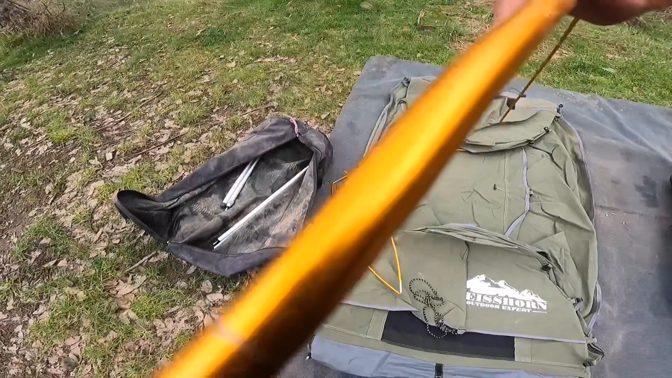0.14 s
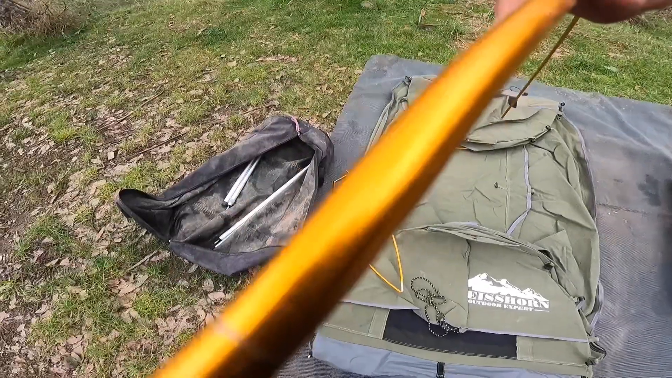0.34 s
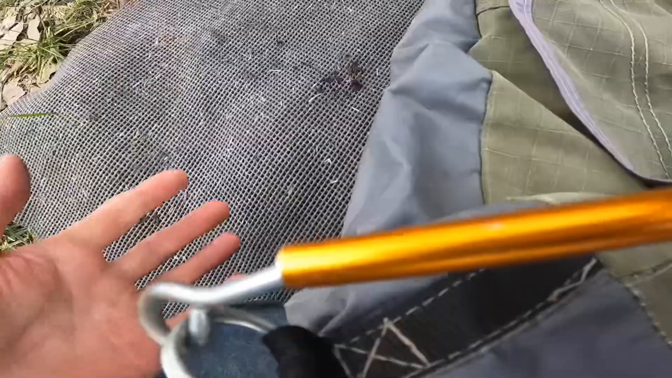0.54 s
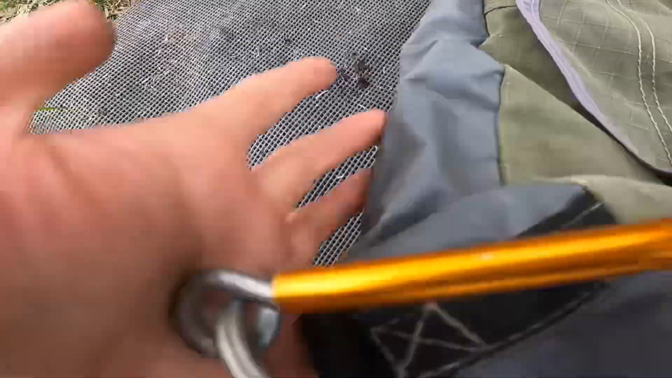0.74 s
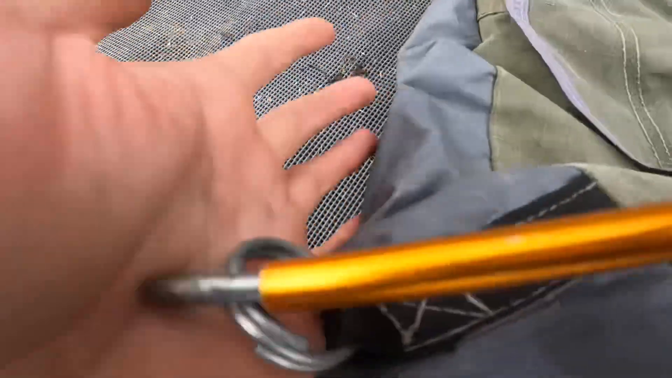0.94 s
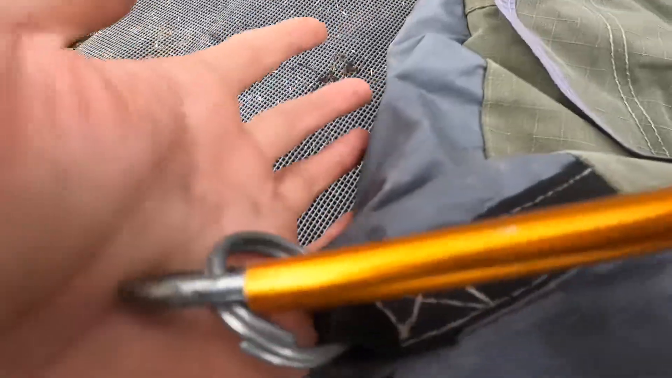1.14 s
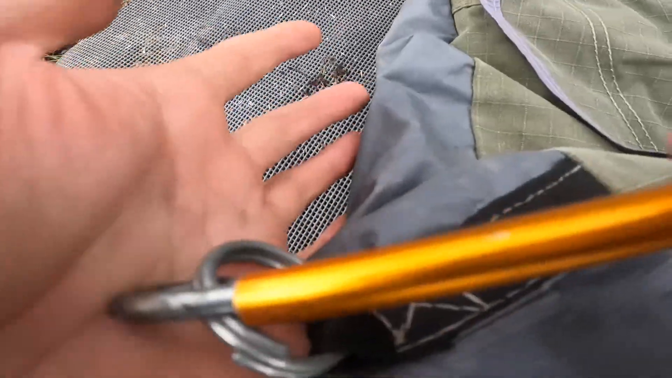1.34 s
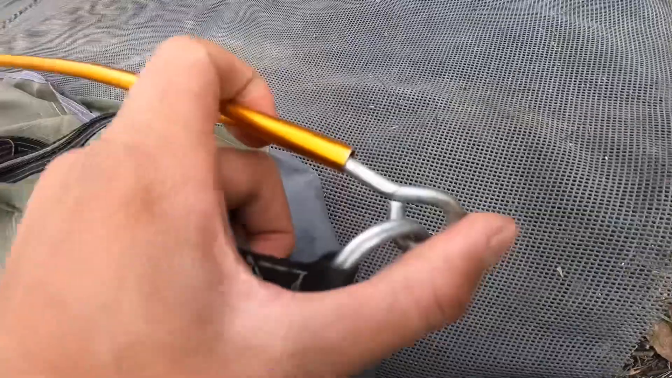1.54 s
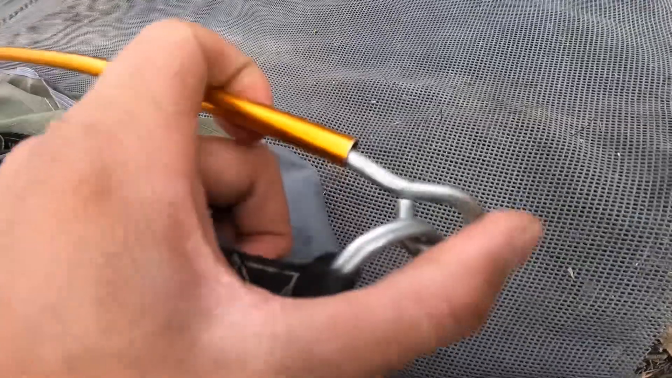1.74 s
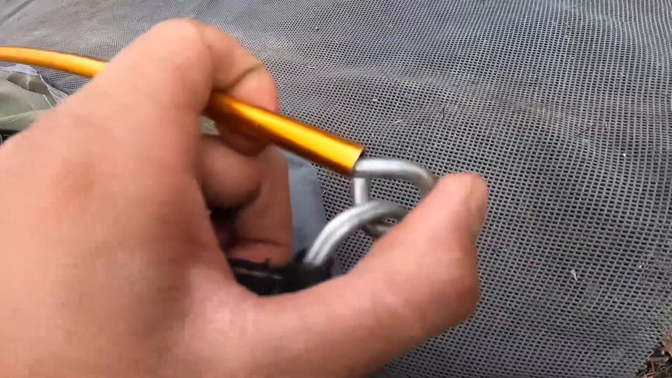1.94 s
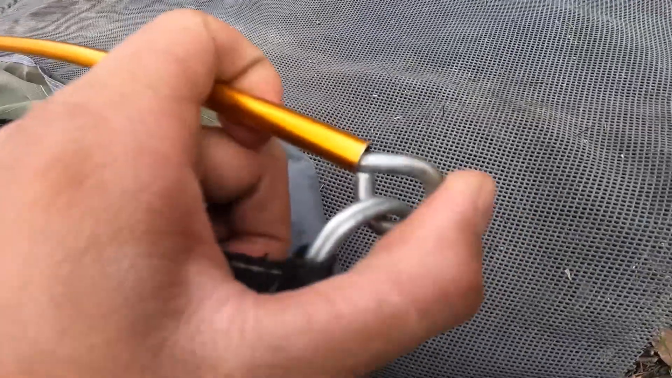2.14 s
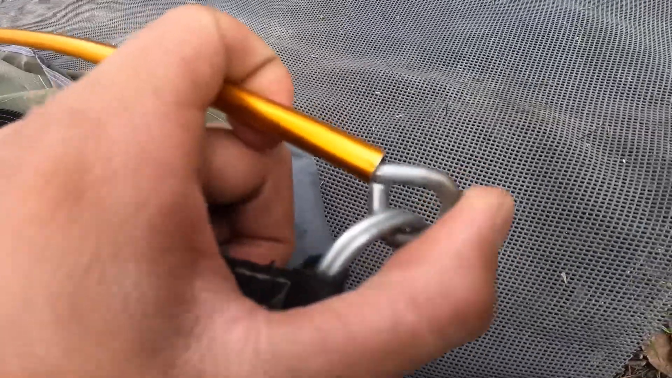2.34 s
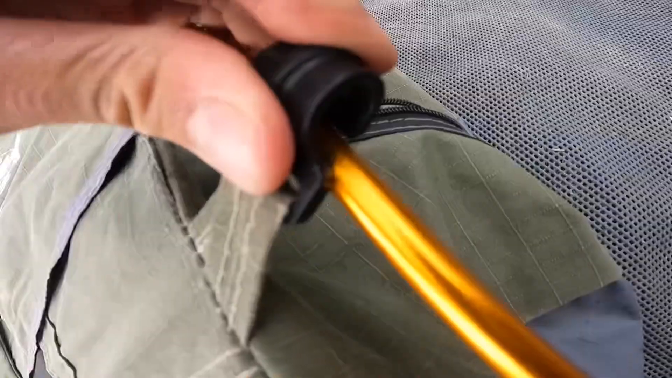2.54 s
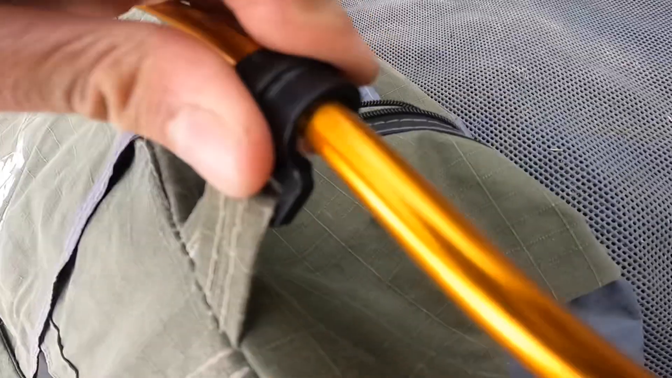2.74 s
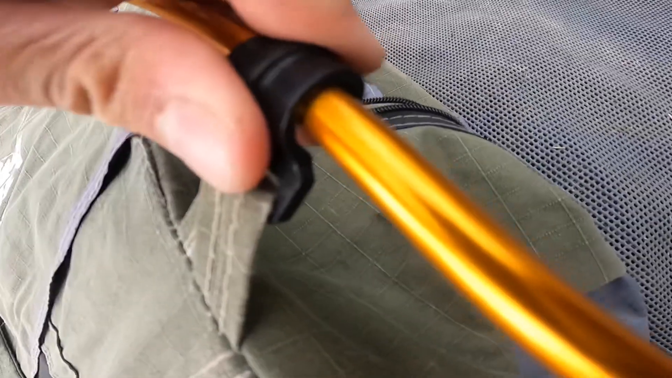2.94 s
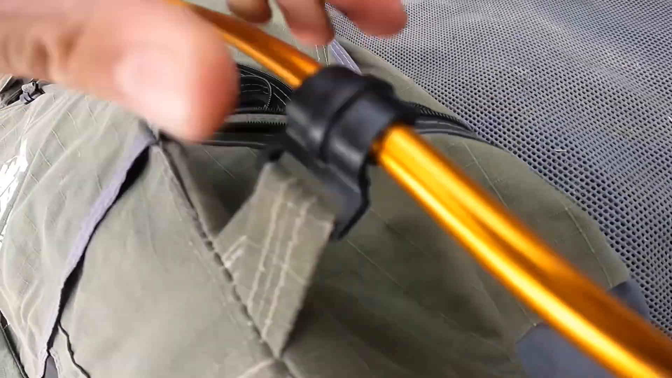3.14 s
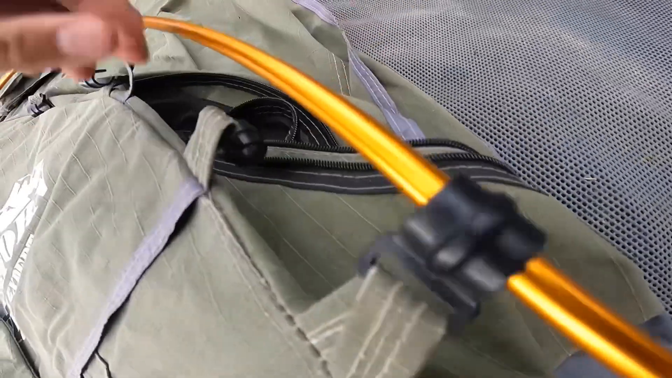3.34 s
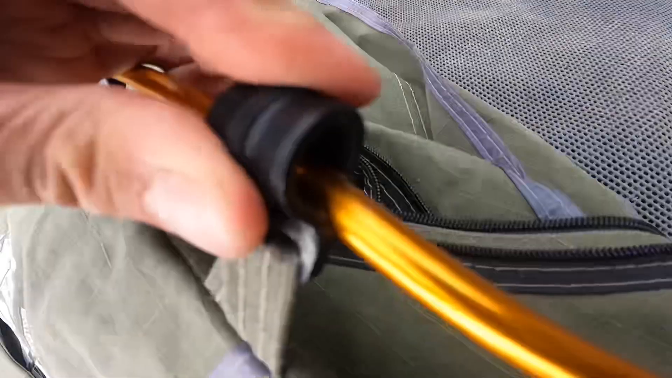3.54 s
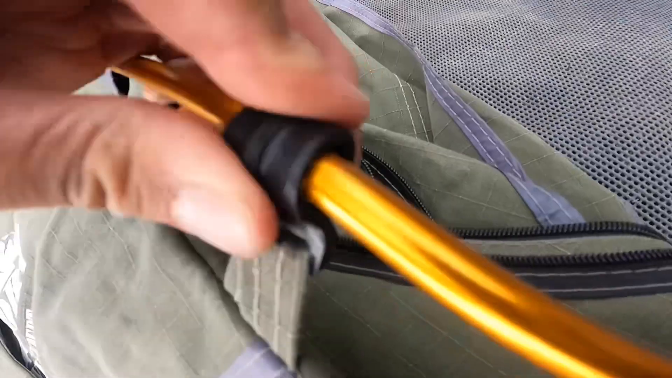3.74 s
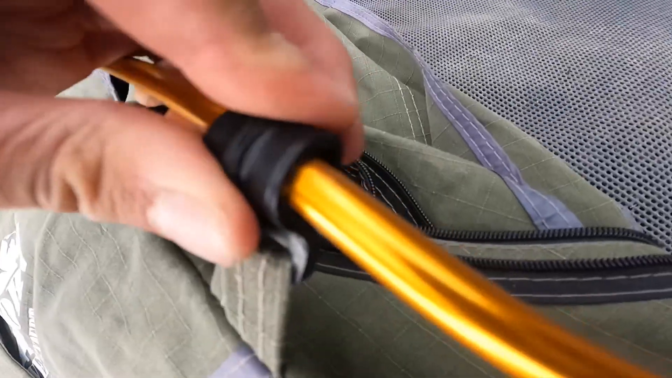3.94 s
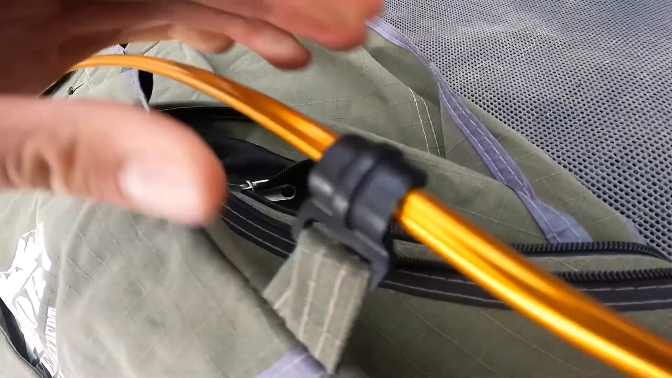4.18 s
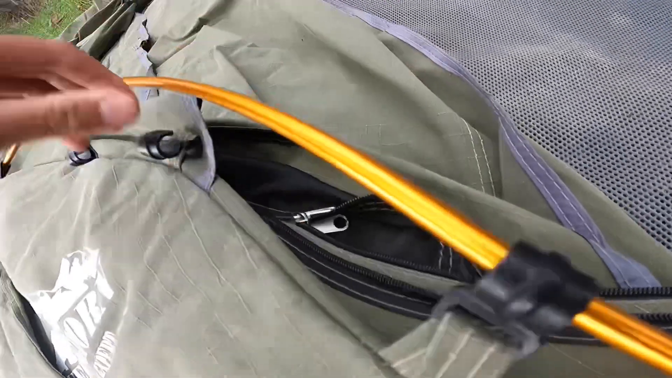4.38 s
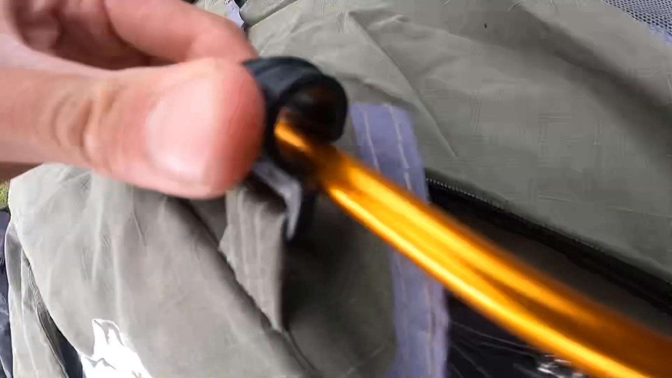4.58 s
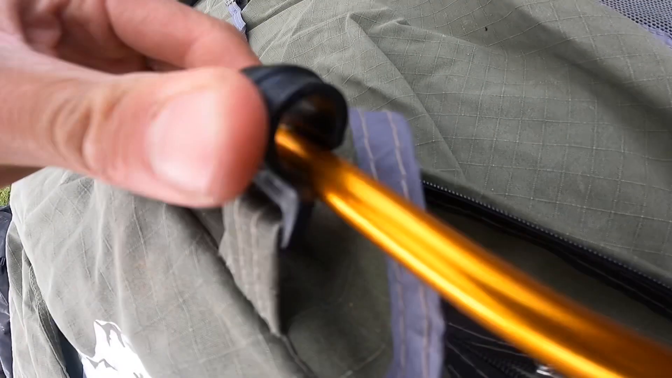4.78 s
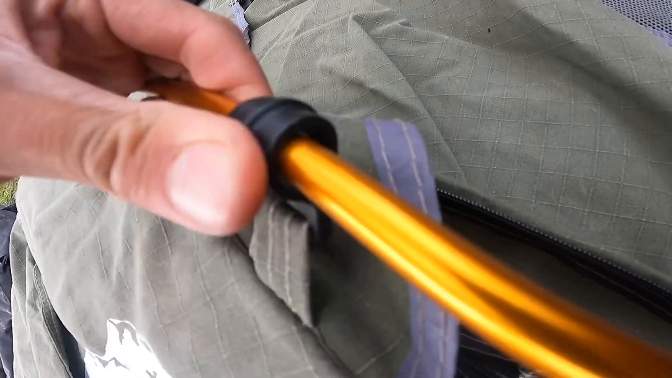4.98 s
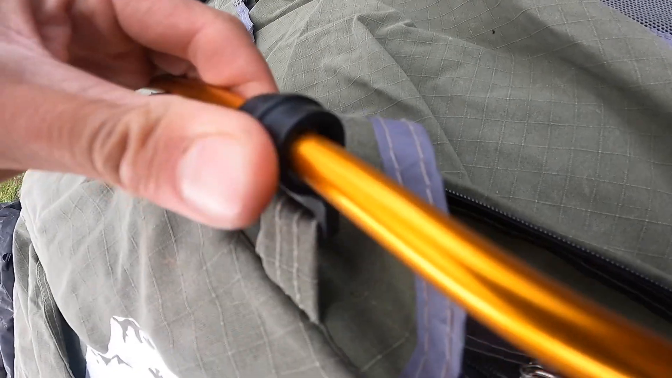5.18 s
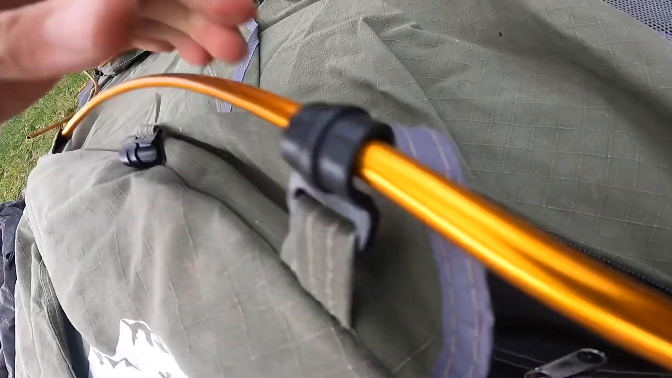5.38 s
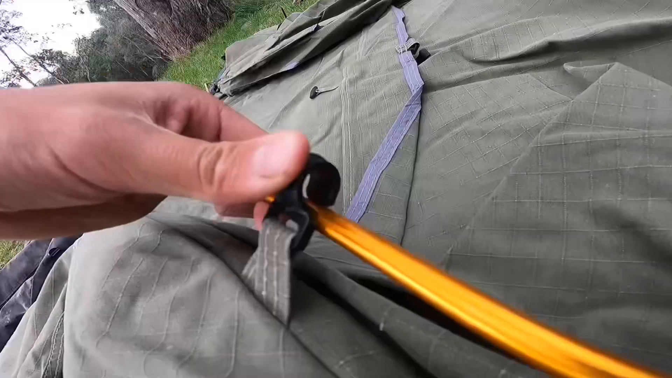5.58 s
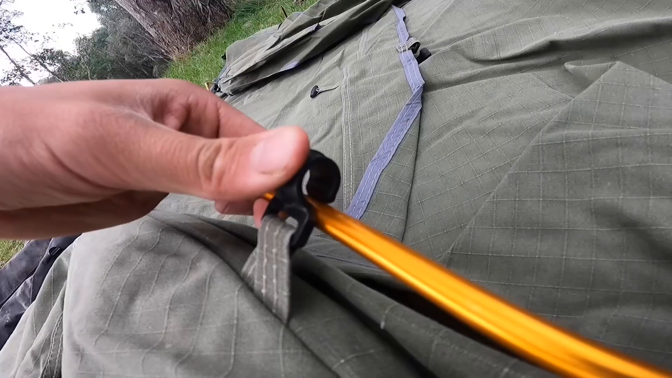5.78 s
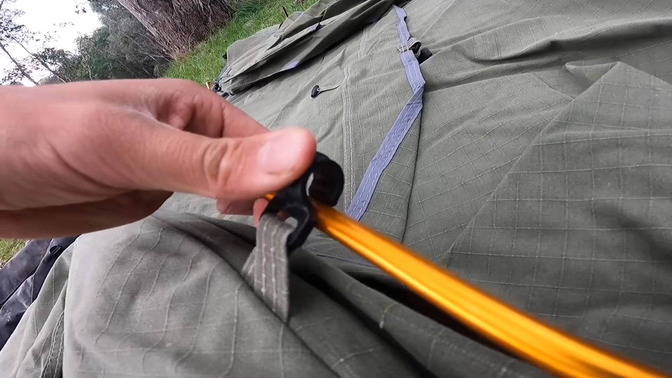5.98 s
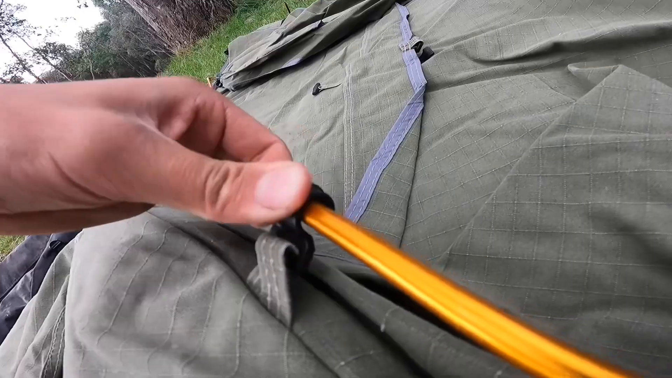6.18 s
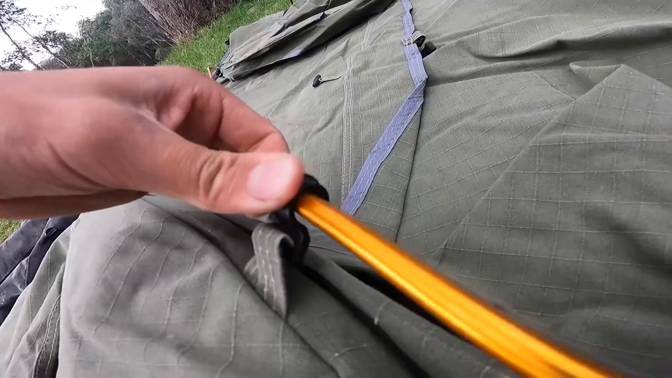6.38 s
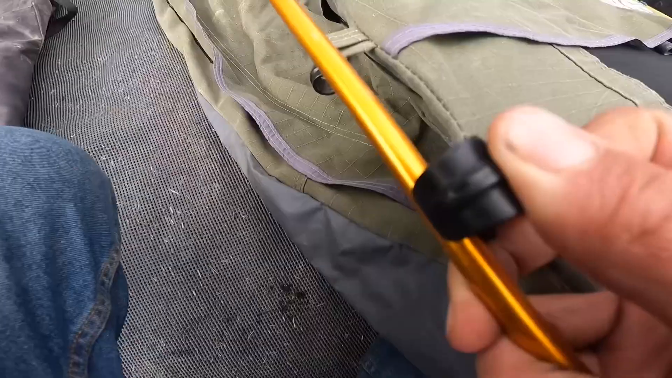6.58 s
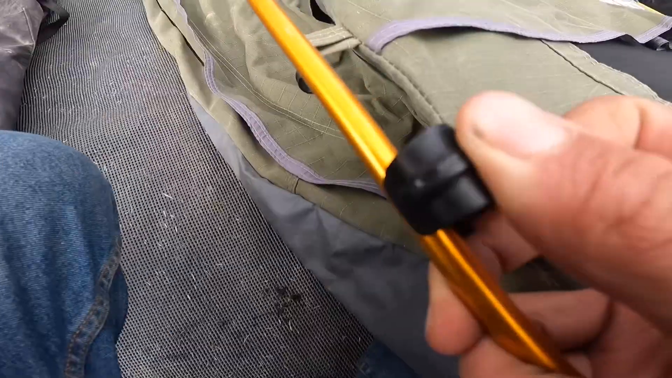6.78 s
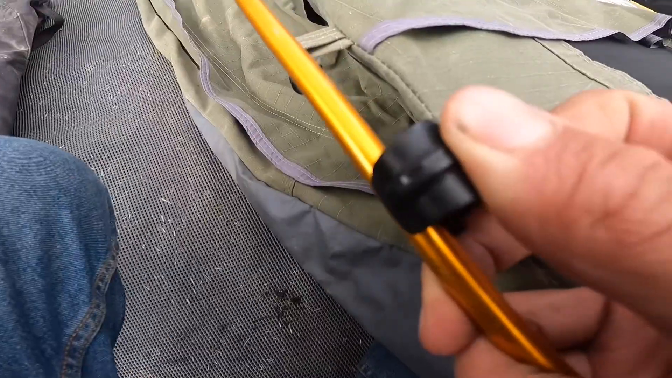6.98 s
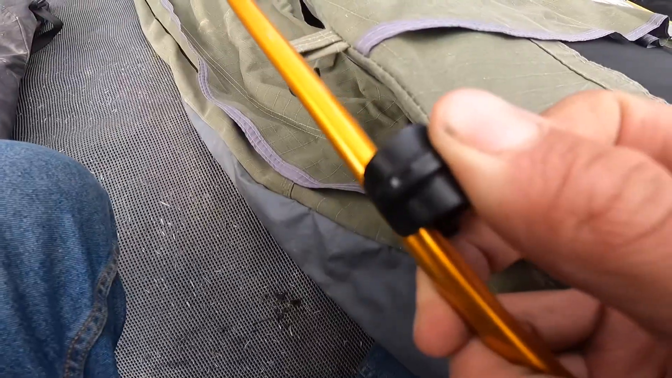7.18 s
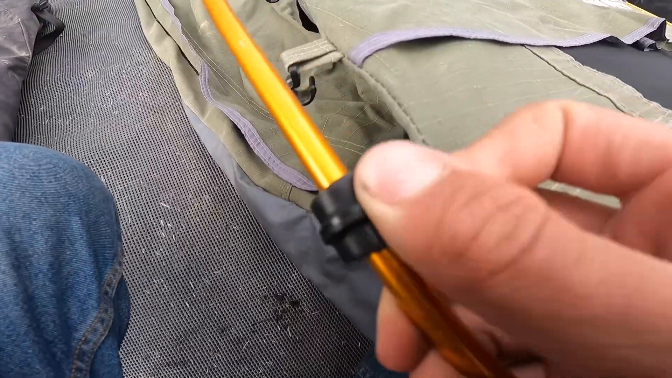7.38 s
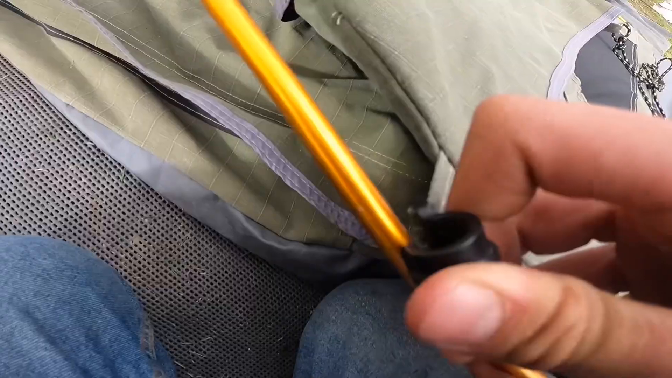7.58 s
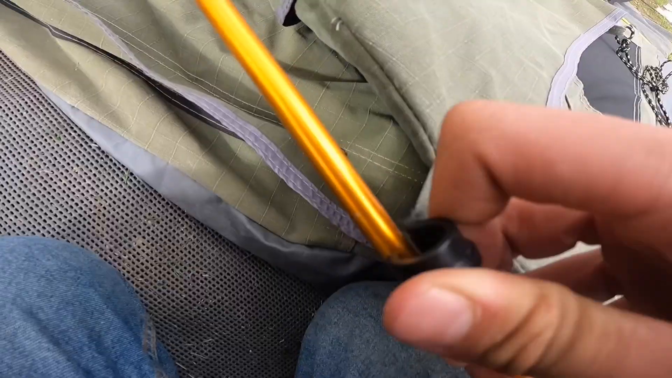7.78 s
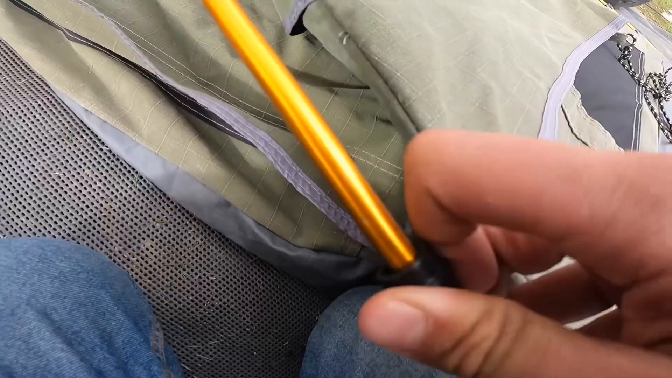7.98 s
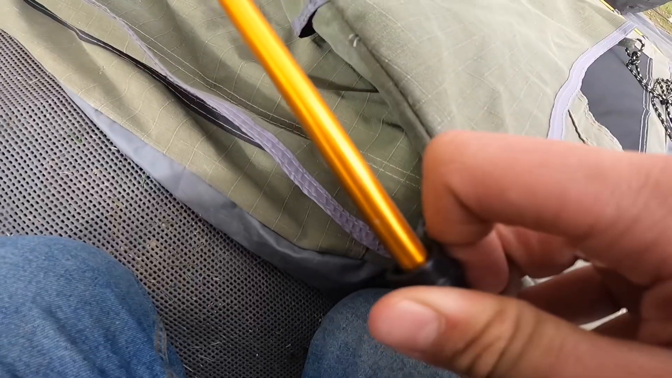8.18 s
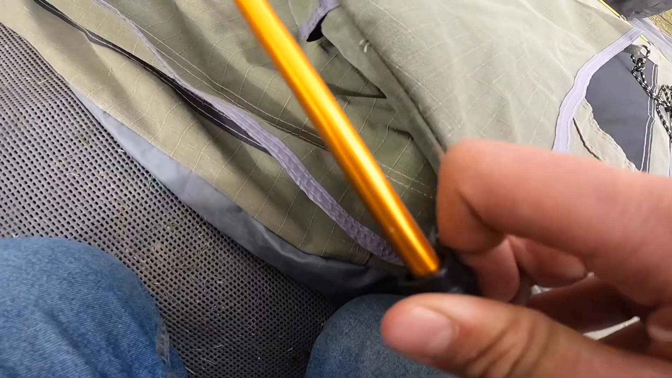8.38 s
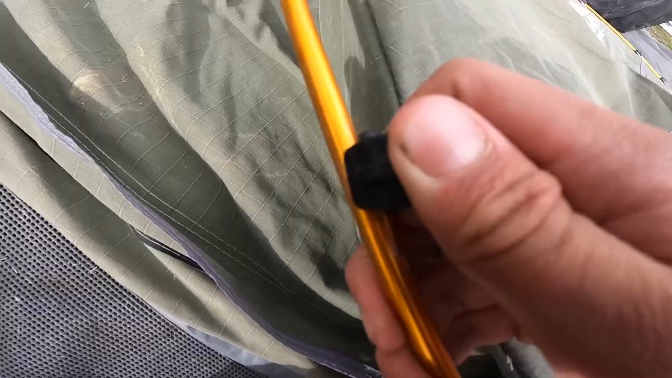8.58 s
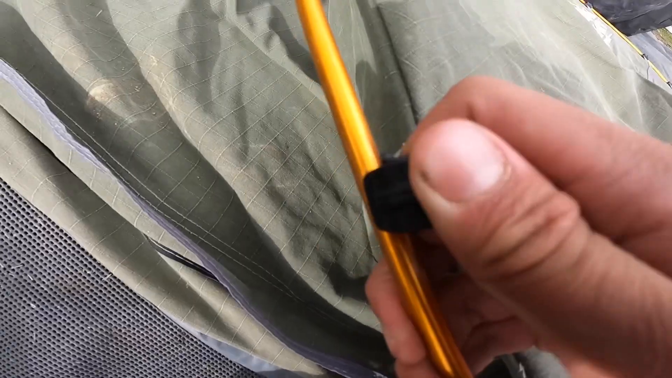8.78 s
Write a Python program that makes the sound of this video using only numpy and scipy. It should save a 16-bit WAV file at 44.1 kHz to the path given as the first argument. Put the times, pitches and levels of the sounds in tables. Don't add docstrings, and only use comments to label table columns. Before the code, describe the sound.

Outdoors, soft leaf hiss and a low distant traffic drone lie under close handling sounds. The first half second is muffled, with a small low bump at the start. At about 0.87 s a hard clack and deep thump begin a flurry of bright steel jingles, ending with another clink near 1.06 s; faint ticks follow around 1.7. A small metallic click lands at 1.98. Plastic clips then creak briefly and snap: a duller one at 2.83, a strong one at 3.86, crisp ones at 4.99, 6.3, 7.48 and 8.01, plus a lighter click at 5.46. Snaps are dry and very short, with pole ring and canvas thump. The background dips after the louder ones. Around every second it drops out for a few hundredths of a second, returning brighter or duller. After 8.1 s only quiet hiss remains.

```python
import sys
import numpy as np
from scipy import signal
from scipy.fft import rfft, irfft
from scipy.io import wavfile
from scipy.ndimage import uniform_filter1d

SR = 44100
rng = np.random.default_rng(int(sys.argv[2]) if len(sys.argv) > 2 else 0)


def ratio_of_db(decibels):
    return 10 ** (np.asarray(decibels, float) / 20)


def wav_out(sig):
    wavfile.write(sys.argv[1], SR, np.round(np.clip(np.atleast_2d(sig).T, -1, 1) * 32767).astype(np.int16))


N = 388962


def gains(table, size):
    hz, db = np.transpose(table)
    return ratio_of_db(np.interp(np.log(np.fft.rfftfreq(size, 1 / SR) + 1), np.log(hz), db))


def colour(x, table):
    return irfft(rfft(x) * gains(table, size=x.shape[-1]), x.shape[-1])


def unit(x, lo_hz, hi_hz):
    band = signal.sosfilt(signal.butter(4, [lo_hz, hi_hz], "band", fs=SR, output="sos"), x)
    return x / np.sqrt(np.mean(band ** 2))


def walk(rate_hz):
    hold = int(SR / rate_hz)
    steps = np.repeat(rng.standard_normal(N // hold + 1), hold)
    return uniform_filter1d(uniform_filter1d(steps, hold), hold)[:N]


def resonate(x, hz, width_hz):
    return signal.lfilter(*signal.iirpeak(hz, hz / width_hz, fs=SR), x)


def fading(t, t60_s):
    return np.exp(-np.log(1000) * t / t60_s)


def add(out, sound, s, pan_db=0.):
    i = int(s * SR)
    sides = ratio_of_db(np.array([[pan_db], [-pan_db]]) / 2)
    out[:, i:i + sound.shape[-1]] += (sound * sides)[:, :N - i]


# start of fade out in seconds, length of fade out in seconds, start of fade in
# in seconds.
CUTS = [(.512, .03, .545), (1.512, .002, 1.546), (2.507, .002, 2.546), (3.511, .002, 3.546),
        (4.512, .018, 4.546), (5.505, .001, 5.546), (6.516, .002, 6.545), (7.508, .002, 7.546),
        (8.516, .018, 8.544)]


def shot(t):
    return np.searchsorted([in_s for _, _, in_s in CUTS], t)


# hiss in dB, traffic drone in dB, wind in dB, share of the shielded microphone 0-1.
SHOTS = [
    (-46, -42.5, -51.5, 1),
    (-47, -41.5, -54.5, 0.07),
    (-49.5, -46, -60, 0.14),
    (-49.5, -43.5, -58, 1),
    (-49, -44.5, -56, 0.5),
    (-47.5, -44.5, -63, 0),
    (-47.5, -45.5, -59.5, 0),
    (-45.5, -42, -60.5, 0),
    (-46.5, -43.5, -61.5, 0),
    (-46.5, -46, -56.5, 0),
]


def shielding(t):
    gust_s, rise_s = 1.0, .2
    gust = (shot(t) == shot(gust_s)) * (t - gust_s) / rise_s
    return np.clip(np.maximum(np.array(SHOTS)[shot(t), -1], gust), 0, 1)


# start in seconds, quick dip in dB, dip that lasts the shot in dB, rumble left in the housing in dB.
DUCKS = [(0, -1.5, 0.5, -24), (.87, -5, 5, -33.5), (1.985, 0, 0.5, -36), (2.84, -2, 2, -26.5),
         (3.865, 6.5, 3.5, -25), (4.995, 18.5, 7, -34), (6.3, 21.5, 4.5, -32.5), (7.482, 23, 24.5, -40.5),
         (8.014, 7, 2.5, -27)]


def ducking(t):
    recover_s, rumble_t60_s = 0.12, .45
    duck_db, rumble = np.zeros(N), np.zeros(N)
    for s, quick_db, lasting_db, rumble_db in DUCKS:
        after = np.maximum(t - s, 0)
        on = (t >= s) & (shot(t) == shot(s + 1 / SR))
        duck_db += on * (quick_db * np.exp(-(after / recover_s) ** 2.4) + lasting_db)
        rumble += on * ratio_of_db(rumble_db) * fading(after, rumble_t60_s)
    return duck_db, rumble


# Hz, dB.
WIDTH = [(30, -11), (70, -14.5), (150, -29.5), (300, -18.5), (600, -12.5), (1500, -7.5), (6000, -7.5),
         (12000, -4)]
# Hz, dB.
LEAN = [(100, -0.5), (600, 2.5), (2000, 3.5), (5000, 0), (8000, 4.5), (14000, 0.5)]


def ports(table):
    mid = colour(rng.standard_normal(N), table)
    side = colour(colour(rng.standard_normal(N), table), WIDTH)
    left = [(hz, db / 2) for hz, db in LEAN]
    right = [(hz, -db / 2) for hz, db in LEAN]
    return np.array([colour(mid + side, left), colour(mid - side, right)])


# Hz, dB.
TURNED = [(180, -3.5), (330, 4.5), (600, -4), (1200, -1), (2100, 1), (2800, -5), (4000, -1.5), (5000, -3),
          (8000, -3)]


def face_ground(x, t):
    turn_s = 6.53
    return np.where(t < turn_s, x, colour(x, TURNED))


# Hz, dB per Hz.
OPEN = [(210, -30.5), (350, 1), (600, 3), (1200, 1), (2000, -3.5), (3000, -4.5), (4000, -5), (5000, -6),
        (6200, -10.5), (7800, -15), (8400, -19.5), (10500, -25.5), (13500, -39), (16000, -70.5)]
# Hz, dB per Hz.
SHIELDED = [(210, -32), (350, 4), (411, -2), (459, 0.5), (791, -1.5), (1110, -2), (1180, -5.5), (2350, -7),
            (2840, -8.5), (3980, -10), (4450, -14.5), (5390, -25), (9290, -38), (12600, -42.5),
            (16000, -77)]
# Hz, dB.
LEAVES = [(600, 0), (1200, -3), (2000, 3), (3200, 1), (4600, -2), (6000, 1.5)]


def hiss(t, share, duck_db):
    dull = unit(colour(rng.standard_normal(N), SHIELDED), 500, 4000)
    dull = np.where(shot(t) == 0, colour(dull, LEAVES), dull)
    bright = face_ground(unit(ports(OPEN), 500, 4000), t)
    level_db = np.array(SHOTS)[shot(t), 0] - duck_db + walk(15)
    return (np.sqrt(1 - share) * bright + np.sqrt(share) * dull) * ratio_of_db(level_db)


# Hz, dB per Hz.
DRONE = [(41, -34), (70, -7), (169, 4.5), (211, 1), (242, -2), (293, -6.5), (442, -15.5), (500, -15),
         (650, -28.5), (1100, -120)]
# Hz, dB per Hz.
WIND = [(10, -13), (25, -4), (50, -5.5), (90, -7.5), (140, -19), (400, -88)]
# Hz, dB per Hz.
RUMBLE = [(15, -12.5), (35, 2.5), (90, -5.5), (180, -12.5), (300, -22), (600, -65.5)]


def bass(t, share, duck_db, rumble):
    drone_db, wind_db = np.array(SHOTS)[shot(t), 1:3].T
    drone = face_ground(unit(ports(DRONE), 100, 400), t)
    drone = drone * ratio_of_db(drone_db - 0.96 * duck_db + 2.2 * walk(12))
    shaking = unit(ports(RUMBLE), 20, 300) * rumble * ratio_of_db(3.3 * walk(30))
    wind = unit(ports(WIND), 20, 90) * ratio_of_db(wind_db - 0.45 * duck_db + 3.0 + 6.6 * walk(7.1))
    low = drone + shaking + wind
    return (1 - share) * low + share * low.mean(axis=0)


# start in seconds, peak in dB, Hz, decay in dB per ms, canvas rattle in dB.
THUMPS = [(.004, -16.5, 44.6, 0.5, -24), (.072, -20, 130, 2.5, -31), (.851, -10.5, 121.5, 1.2, -18.5),
          (.865, -4.5, 140, 3, -31), (.873, -1.5, 70.8, 2.5, -16), (1.06, -26.5, 59.8, 1.05, -9.5),
          (1.986, -12, 110, 2.5, -20.5), (2.8304, -12, 62.5, 1, -13), (2.843, -14.5, 107.5, 1, -18),
          (3.262, -33, 70, 1.5, -25), (3.857, -11, 82, 0.6, -20), (4.3, -31.5, 40, 1, -18),
          (4.988, -23.5, 69.5, 0.8, -8), (5.459, -22, 45, 1.76, -9), (6.3022, -16.5, 193.5, 1.3, -42.5),
          (7.467, -22, 80.4, 1.5, -19), (0.856, -13, 242.2, 2.5, -24.5), (3.866, -17, 240, 4, -14),
          (8.02, -17.5, 263, 2.5, -27), (2.847, -23.5, 233, 0.5, -25), (7.482, -10.5, 62, 3, -24),
          (7.475, -29.5, 200, 1, -14.5), (8.0097, -18.5, 69, 1.3, -24.5), (8.019, -20, 90, 3.5, -32)]
# start in seconds, peak in dB, Hz.
REBOUNDS = [(0.035, -23, 111), (.104, -28, 70.2), (0.933, -20.5, 56.6), (.975, -20, 34.8),
            (2.879, -18, 44.8), (2.935, -28, 40), (2.965, -30, 45), (3.985, -34, 60.5), (8.115, -32, 50),
            (3.265, -31.5, 35), (3.878, -21, 90), (3.89, -14, 40), (5.015, -27, 44.6), (5.043, -31.5, 79.5),
            (6.33, -26, 35), (8.024, -22.5, 154), (8.046, -14.5, 34), (8.081, -28.5, 69)]
GRIP_DB = [-18.5, -3.5, -1.1, 8, -3.5, -5.5, -2, -10.5, -2, -1.1]


def thumps(out):
    t = np.arange(12000) / SR
    rebound_db_per_ms, rebound_rattle_db = 0.8, -30.5
    blows = THUMPS + [(*row, rebound_db_per_ms, rebound_rattle_db) for row in REBOUNDS]
    for s, peak_db, hz, decay_db_per_ms, rattle_db in blows:
        swing = -np.sin(2 * np.pi * hz * t * (1 - 0.17 * np.minimum(t * hz / 4, 1)))
        flap, rattle = rng.standard_normal((2, 1, len(t))) + .35 * rng.standard_normal((2, 2, len(t)))
        flap = resonate(resonate(flap, 1.8 * hz, 2.2 * hz), 2.0 * hz, 2.8 * hz)
        flap = flap / flap.std() * fading(t, 0.2)
        rattle = resonate(resonate(rattle, 700.0, 1400.0), 700.0, 1400.0) * fading(t, 0.027)
        body = swing + ratio_of_db(rattle_db + 6.5) * flap + ratio_of_db(rattle_db + 24.0) * rattle
        push = np.sin(np.pi / 2 * np.minimum(t * hz * 2.33, 1)) ** 2
        level = ratio_of_db(peak_db + 6 - 1000 * t * decay_db_per_ms)
        add(out, level * push * body, s - .12 / hz * (s > .01), pan_db=GRIP_DB[shot(s)])


# release in seconds, level in dB, length in seconds, Hz, width in Hz.
SCRAPES = [(.869, -24.5, .014, 7000, 2500), (1.981, -37.5, .005, 11760, 1500), (1.98, -35, .012, 5270, 960),
           (2.834, -20, .03, 2600, 730), (2.834, -39.5, .032, 10300, 1200), (2.831, -35, 0.018, 6510, 200),
           (3.86, -24.5, .028, 2900, 800), (3.851, -54.5, .018, 12000, 1500),
           (3.858, -41, .014, 12000, 900), (4.991, -37, 0.024, 3900, 900), (7.478, -31.5, 0.013, 7400, 700),
           (8.0115, -27, .004, 6500, 600)]


def scrapes(out):
    slips_per_s, scatter_db = 2500, 3.5
    for s, level_db, length_s, hz, width_hz in SCRAPES:
        when, size = rng.random(2048), rng.standard_normal(2048)
        strain = np.arange(2048) / (length_s * SR)
        slips = (when < slips_per_s / SR) * np.sign(size) * ratio_of_db(scatter_db * size) * (strain < 1)
        drag = resonate(resonate(slips, hz, 1.5 * width_hz), hz, 1.5 * width_hz)
        drag = drag / drag[strain < 1].std()
        add(out, ratio_of_db(level_db) * np.minimum(strain, 1) ** 1.8 * drag, s - length_s)


# release in seconds, squeak in dB, length in seconds, squeak in Hz, broad rub in dB.
CREAKS = [(0.864, -33.5, 0.02, 3000, -20.5), (1.982, -41.5, 0.017, 5310, -31.5),
          (2.835, -30.5, 0.028, 2960, -26), (2.836, -26.5, 0.025, 4200, -52),
          (2.837, -48, 0.03, 10300, -52), (3.859, -35, 0.029, 3230, -31), (3.859, -38.5, 0.023, 7900, -63),
          (3.862, -32, 0.023, 4170, -55), (4.991, -34.5, 0.015, 3830, -40), (4.99, -48, 0.024, 8070, -48),
          (5.036, -54.5, 0.013, 3740, -68), (5.043, -53.5, 0.036, 9280, -66), (6.296, -38, 0.02, 8070, -43),
          (7.481, -38, 0.04, 7930, -30), (8.01, -51, 0.013, 6460, -30)]
# Hz, dB.
RUB = [(500, -7.5), (1200, 4), (3000, -2), (5000, -7), (9000, -5.5)]


def creaks(out):
    for s, squeak_db, length_s, hz, rub_db in CREAKS:
        slips = rng.standard_normal(2048)[:int(length_s * SR)]
        strain = np.linspace(0, 1, len(slips))
        rub = colour(colour(np.pad(slips, 512), SNAP), RUB)
        rub = np.roll(rub, -512)[:len(slips)]
        wobble = resonate(resonate(slips, hz, 300.0), hz, 300.0)
        squeak = np.sin(2 * np.pi * hz * np.arange(len(slips)) / SR) + .3 * wobble / wobble.std()
        squeak = ratio_of_db(squeak_db) * strain ** 1.2 * squeak / squeak.std()
        add(out, squeak + ratio_of_db(rub_db) * strain ** 4.1 * rub / rub.std(), s - length_s)


# (Hz, dB).
RINGS = [(.003, 80, [(230, -24)]), (.646, 33, [(200, -27.5)]), (0.8518, 27, [(400, -15)]),
         (0.8706, 5.9, [(1680, -11.5), (4600, -10.5), (8500, -13)]), (0.8978, 12, [(1250, -27)]),
         (.907, 6, [(4700, -29.5)]), (.952, 6, [(5900, -14)]), (1.058, 6.1, [(2900, -15.5), (1908, -24),
         (3580, -17)]), (1.9845, 5, [(6070, -6), (6970, -9), (3600, -12), (11950, -20), (1700, -16.5)]),
         (2.829, 22, [(670, -21.5), (1200, -23.5), (1760, -24)]), (2.8349, 5, [(5000, 1), (13300, -15),
         (3750, -8), (12470, -16), (10100, -21)]), (2.8391, 6, [(3700, -13), (12800, -26.5)]),
         (2.857, 9.1, [(2900, -27)]), (3.8605, 5.9, [(3665, -4), (2936, -7.5), (6965, -1), (7600, -5.5),
         (12280, -11.5)]), (3.8842, 14, [(3250, -27)]), (3.861, 18, [(750, -15.5)]),
         (3.8656, 11, [(6880, -7.5), (3490, -19.5)]), (4.992, 4.4, [(2545, -3.5), (4040, -3.5), (7130, -2),
         (5500, 1), (11070, -7), (6445, -1.5), (8800, -9), (14530, -22)]), (5.4602, 3.4, [(2280, -18),
         (3660, -12), (4500, -15.5), (5930, -16), (6600, -14.5), (1150, -22), (9160, -26)]),
         (5.4635, 5, [(3700, -27), (5800, -27)]), (6.2971, 4.9, [(3053, -2.5), (3894, -6.5), (6240, 3.5),
         (5380, -3), (10220, -9), (8850, -10), (12300, -24)]), (7.4794, 6, [(1300, -19.5)]),
         (7.4807, 4.06, [(3040, -3), (3700, -13), (4850, 2), (10940, -10.5), (5700, 2), (9170, -10),
         (8300, -12), (14300, -22), (12880, -21)]), (8.0129, 3.8, [(4600, -4), (5320, -4), (6200, -4),
         (3590, -6.5), (7450, -7), (9200, -7), (1760, -11)]), (8.016, 6, [(10000, -21)]),
         (8.0135, 25, [(85, -16)]), (6.2996, 16, [(190, -16.5)]), (0.8543, 30, [(270, -16)]),
         (0.061, 40, [(150, -20)]), (0.044, 30, [(160, -24)]), (.853, 6, [(1150, -20)]),
          (0.87, 4.1, [(3130, -12), (5950, -10.5), (8550, -12)]), (.8734, 4, [(4600, -13), (7700, -14),
          (10000, -15)]), (1.0597, 5.4, [(3450, -20), (5300, -20)]), (1.0605, 20, [(1250, -30)]),
          (1.0745, 4, [(2500, -36), (4700, -36)]), (2.836, 60, [(75, -15)]), (2.846, 50, [(155, -18.5)]),
          (2.844, 40, [(10100, -42), (11200, -42)]), (2.857, 40, [(10200, -52), (12500, -54)]),
          (.0705, 5.4, [(2000, -30), (3300, -32)]), (7.9512, 3.3, [(3500, -36), (6500, -30)]),
          (5.466, 6.7, [(1200, -34), (3300, -34)]), (4.993, 10, [(1060, -20.5)]), (4.225, 3, [(6000, -48),
          (12000, -50)]), (4.26, 3, [(11500, -52)]), (3.232, 20, [(350, -38), (850, -42)]),
          (3.245, 25, [(320, -35), (620, -38)]), (3.253, 30, [(200, -33)]), (3.863, 4, [(8900, -9),
          (12600, -12)]), (5.0015, 8, [(5000, -27), (9800, -36)]), (7.4735, 6, [(7000, -29.5)]),
          (7.4789, 8.4, [(900, -18), (1900, -16.5)]), (7.477, 31, [(170, -18)]), (8.0278, 9.6, [(2500, -30),
          (5500, -29), (9000, -36)]), (8.0425, 8, [(2000, -38.5), (4200, -40)]),
          (8.067, 9.4, [(1800, -38)])]


def rings(out):
    t = np.arange(8192) / SR
    for s, t60_ms, modes in RINGS:
        hz, db = np.transpose(modes)[:, :, None]
        sides = (-1.) ** np.arange(len(modes))[:, None]
        ring = sides * ratio_of_db(db + 2) * np.sin(2 * np.pi * hz * t) * fading(t, t60_ms / 1000)
        add(out, ring.sum(axis=0) * np.minimum(t / .00025, 1), s)


# start in seconds, peak in dB, upper mode in dB, share of the ring time,
# pitch rise in % as the pin comes free.
JINGLES = [
    (.872, -16, -6, 0.22, 0),
    (.887, -26.5, -8, 0.47, 0),
    (.896, -25, -12, 1.6, .3),
    (0.9162, -25.5, -6, 0.93, .2),
    (0.952, -10, -0.5, 0.38, .2),
    (0.9633, -15, -10, 0.65, 0.63),
    (0.9892, -16, -0.5, 0.13, 1.5),
    (1.058, -13.5, 2, 0.38, 1.4),
]
# Hz, dB, t60 in seconds.
PIN = [(6420, -7, 0.076), (6600, -1.5, 0.12), (3480, -24.5, 0.12), (6540, -11, 0.06), (6860, -14, .04),
       (7120, 0.5, 0.1)]


def jingles(out):
    t = np.arange(8192) / SR
    pin_rise_s, catch_s = .015, .004
    hz, db, t60_s = np.transpose(PIN)[:, :, None]
    for s, peak_db, upper_db, share, rise in JINGLES:
        bent = t + rise / 100 * (t - pin_rise_s * (1 - np.exp(-t / pin_rise_s)))
        caught_s = .998 if s < .998 else 1.084
        free = np.exp(-np.maximum(s + t - caught_s, 0) / catch_s)
        chance = rng.standard_normal((3, len(PIN), 1))
        strength = ratio_of_db(db + 0.99 * chance[0] + upper_db * (hz > 7000) - max(upper_db, 0))
        wave = np.sin(2 * np.pi * hz * (1 + .001 * chance[1]) * bent + chance[2])
        ring = (strength * fading(t, t60_s * share) * wave).sum(axis=0)
        add(out, ratio_of_db(peak_db - 5.0) * ring * np.minimum(t / 0.000665, 1) * free, s)


# start in seconds, peak in dB, strongest Hz, treble in dB, left minus right in dB.
SNAPS = [(.8654, -13, 7260, -21, -2), (0.8696, -4, 3140, -16.5, -2), (.872, -11, 4525, -15, -3.1),
         (0.8878, -20, 6240, -28, -4.5), (0.8961, -21.5, 6620, -23.5, -1), (.9153, -28.5, 6565, -17, -2.5),
         (.9634, -16.5, 6620, -25, -1.5), (1.0574, -18, 3370, -17.5, -4.5), (1.9844, -15, 6320, -23, 0),
         (1.9873, -12, 6060, -24.5, -1), (2.8342, -15, 6500, -23.5, 0), (3.8646, -6, 6850, -24.5, -5),
         (4.9917, -6, 5700, -23.5, 2.8), (4.9926, -9, 5200, -22.5, 0), (5.46, -17.5, 5000, -25.5, -2.5),
         (6.2967, -9.5, 5920, -22.5, 2.5), (7.4803, -14, 6300, -27, -2), (8.0124, -7.5, 4670, -26, -5),
         (8.016, -14.5, 1810, -17, 3.3), (8.0254, -22, 5000, -27, 0.5), (4.195, -54, 11700, -9, 0),
         (2.81, -52, 11000, -5, -0.5), (3.8614, -7, 3750, -18.5, -7), (6.298, -11, 3080, -29, 1.5)]
CHATTERS = [(.0014, -22, 2750, -28, 0), (.87, -18, 3980, -9.5, 1), (.879, -16, 5000, -17, 0.5),
            (0.9513, -14, 5690, -20, 0), (.9892, -30, 6720, -25, 1), (2.839, -13, 3503, -27, 0),
            (2.8484, -26, 2950, -24, 4), (3.8596, -5.5, 3020, -28, -3), (3.8637, -18.5, 7000, -24.5, -7),
            (.9595, -20, 3534, -21.5, -3), (3.8834, -25.5, 3316, -21, -5)]
# start in seconds, peak in dB, strongest Hz.
TICKS = [(.0702, -29, 2530), (.8515, -20.5, 2660), (1.0694, -25, 7200), (1.6786, -38, 4730),
         (1.7516, -35.5, 3610), (3.245, -44, 2520), (3.2624, -42.5, 3930), (3.8978, -33, 3130),
         (4.2913, -34.5, 3950), (5.001, -29, 4280), (5.0125, -36.5, 3740), (6.31, -40.5, 3950),
         (6.3168, -41.5, 3000), (6.3374, -47.5, 3370), (6.287, -30.5, 4000), (4.9815, -25, 2190),
         (8.0607, -47, 4000), (3.925, -46, 3000), (6.7595, -37, 4170), (7.4692, -24, 4800),
         (7.9504, -32, 4500), (8.0404, -33.5, 3710), (8.0655, -34.5, 3490)]
# Hz, dB per Hz.
SNAP = [(240, -60.5), (400, -8), (657, -9.5), (1470, -4.5), (2730, -3.5), (4210, -3.5), (6300, -3.5),
        (7950, -3.5), (9000, -10.5), (11400, -15), (13500, -22), (16200, -38)]


def snaps(out):
    t = np.arange(4096) / SR
    pad, lead = 256, 40
    snap_db_per_ms, chatter_db_per_ms, tick_db_per_ms, tick_treble_db = 6.5, 2.5, 8, -27.5
    contacts = [(*row, snap_db_per_ms) for row in SNAPS]
    contacts += [(*row, chatter_db_per_ms) for row in CHATTERS]
    contacts += [(*row, tick_treble_db, 0, tick_db_per_ms) for row in TICKS]
    for s, peak_db, hz, treble_db, pan_db, decay_db_per_ms in contacts:
        impacts = rng.standard_normal(len(t)) * ratio_of_db(3 * rng.standard_normal(len(t)))
        fall_db = 1000 * np.maximum(t - .0008, 0) * decay_db_per_ms
        envelope = (ratio_of_db(-fall_db) + ratio_of_db(-27 - 0.69 * fall_db)) * np.minimum(t / 0.0003, 1)
        wide = colour(np.roll(impacts * envelope, pad), SNAP)
        wide = wide - np.clip((hz - 4000) / 3500, 0, .8) * resonate(wide, 1000.0, 2200.)
        treble = colour(wide, [(6000, -39.5), (9000, 6.5), (20000, -4.5)])
        wide = wide + (ratio_of_db(treble_db + 27) - 1) * treble
        sound = wide + ratio_of_db(5.0) * resonate(wide, hz, 1100.) + ratio_of_db(-5.5) * resonate(wide, 3500.0, 550.0)
        sound = sound * ratio_of_db(peak_db) / np.abs(sound).max()
        add(out, sound[pad - lead:], s + .0006 - lead / SR, np.clip(pan_db, -4, 4))


# Hz, dB, lead in radians.
PORT = [(200, -0.5, 0.16), (500, -4, .45), (1298, -4, 0.0096), (3000, 0.5, -0.5), (5500, 3, 0.23),
        (8500, 1.5, -0.1), (13000, 0, .2)]


def housing(near):
    scatter_db, scatter_t60_s = -11, 0.0053
    hz, db, lead_rad = np.transpose(PORT)
    log_bins = np.log(np.fft.rfftfreq(N, 1 / SR) + 1)
    level_db = np.interp(log_bins, np.log(hz), db)
    phase = np.interp(log_bins, np.log(hz), lead_rad)
    turn = ratio_of_db(level_db / 2) * np.exp(.5j * phase)
    edges = rng.standard_normal(256) * fading(np.arange(256) / SR, scatter_t60_s)
    side = ratio_of_db(scatter_db) * signal.fftconvolve(near.mean(axis=0), edges / np.linalg.norm(edges))[:N]
    return irfft(rfft(near + [side, -side]) * [turn, 1 / turn], N)


# Hz, dB.
COVER = [(4500, -1), (5500, -10.5), (7000, -11.5), (9000, -12.5), (10500, -1), (16000, 4.5)]
# Hz, dB.
OVER_SHIELD = [(10500, 0.5), (12500, -12)]


def shield(near, body):
    covered = colour(near.mean(axis=0), COVER)
    return np.array([colour(covered, OVER_SHIELD), covered]) + body.mean(axis=0)


def scene():
    t = np.arange(N) / SR
    share = shielding(t)
    duck_db, rumble = ducking(t)
    far = hiss(t, share, duck_db) + bass(t, share, duck_db, rumble)
    near, body = np.zeros((2, 2, N))
    thumps(body)
    for source in (scrapes, creaks, rings, jingles, snaps):
        source(near)
    return far + (1 - share) * (housing(near) + body) + share * shield(near, body)


# Hz, dB.
MIC = [(12000, -0.5), (14000, 0.5), (15500, -7.5), (17000, -22.5)]


def band_limit(x):
    return signal.sosfilt(signal.butter(12, 16370, fs=SR, output="sos"), x)


def record(dry):
    t = np.arange(N) / SR
    fade_in_s, silence_db = .032, -70
    gain = np.ones(N)
    for out_s, fade_s, in_s in CUTS:
        falling = np.clip(1 - (t - out_s) / fade_s, 0, 1)
        rising = np.clip((t - in_s) / fade_in_s, 0, 1)
        gain *= np.maximum(np.maximum(falling, rising), ratio_of_db(silence_db))
    return band_limit(colour(np.clip(dry, -1, 1), MIC) * gain)


dry = scene()
out = record(dry)
wav_out(out)
```